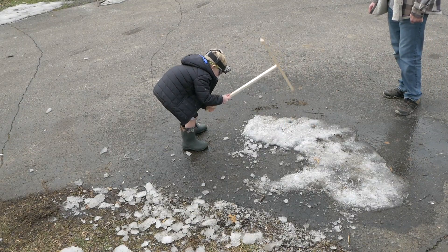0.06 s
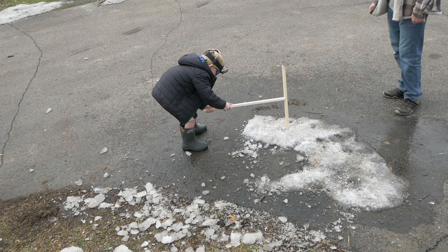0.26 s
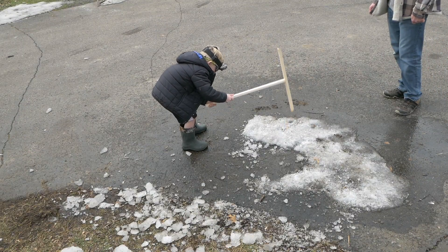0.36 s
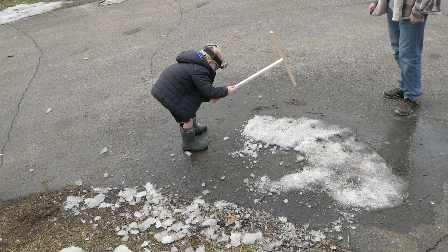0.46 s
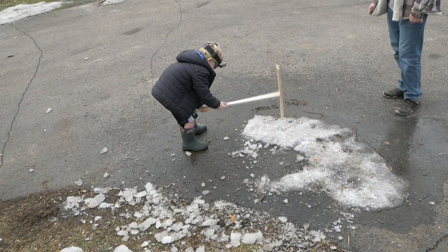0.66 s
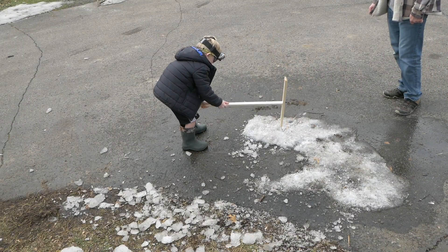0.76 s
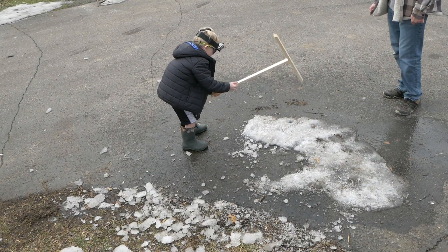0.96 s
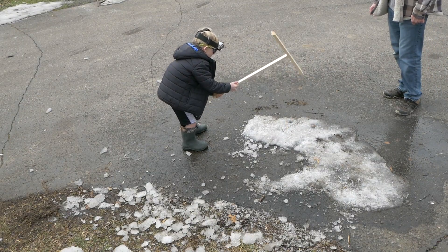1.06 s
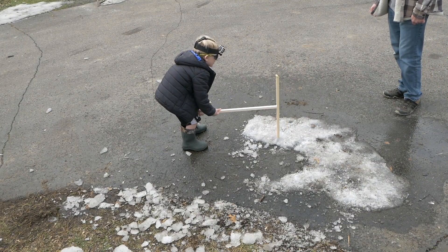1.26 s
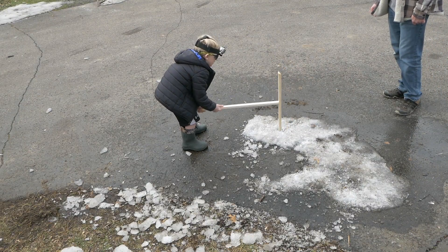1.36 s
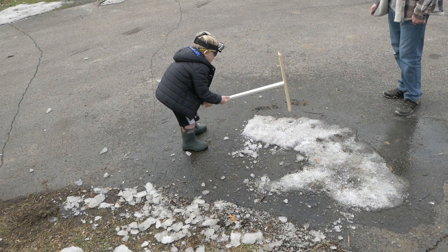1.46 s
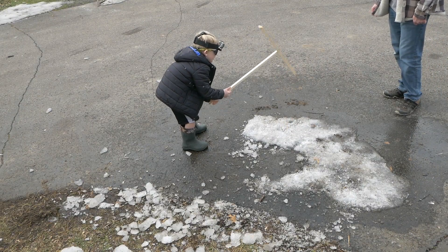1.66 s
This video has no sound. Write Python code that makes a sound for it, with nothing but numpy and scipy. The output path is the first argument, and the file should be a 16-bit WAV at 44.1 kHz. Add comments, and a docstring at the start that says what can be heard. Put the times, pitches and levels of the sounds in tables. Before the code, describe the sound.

A pick strikes ice on pavement at about 0.2, 0.7 and 1.3 seconds, a few metres away. Each blow is a sharp crack with a short thud and a brief ring from the pick. Ice crumbs patter down after each one, and faint ticks and scuffs fall in between. A soft, short echo trails the strikes, over a quiet, low outdoor rumble throughout.

```python
"""A pick on ice

A pick with a wooden handle strikes ice on wet pavement three times, a few metres away.
Each blow cracks the ice, thuds into the ground and rings the pick; loose chips tick afterwards.
The surroundings send back a late wash of sound and one faint echo over a quiet outdoor hush."""
import sys
import numpy as np
from scipy import signal
from scipy.fft import rfft, irfft
from scipy.io import wavfile
from scipy.ndimage import uniform_filter1d

SR = 44100
rng = np.random.default_rng(int(sys.argv[2]) if len(sys.argv) > 2 else 0)


def dump(signal):
    """Clip the signal to [-1, 1] and save it as 16-bit WAV at the path in sys.argv[1]."""
    limited = np.clip(np.atleast_2d(signal).T, -1, 1)
    pcm = np.round(limited * 32767).astype(np.int16)
    wavfile.write(sys.argv[1], SR, pcm)


N = 74970
T = np.arange(N) / SR

# The blows: t/s, crack level/dB, crack decay/s, thud level/dB, thud f/Hz,
# crumble level/dB, crumble decay/s, second bite delay/s, bite level/dB
STRIKES = [(0.217, -8, 0.0026, -25, 214, -12, 0.0024, 0.0037, -19.5),
           (0.745, -11.5, 0.0015, -14.5, 386, -26.5, 0.0049, 0.0042, -22),
           (1.3008, -12, 0.0026, -17.5, 302, -19, 0.0047, .0162, -24.5)]
def pick_blows(crack_hold_s=0.00084, bite_decay_s=0.0046):
    """The ice cracks and crumbles, the ground thuds, the pick rings and its tip bites once more."""
    out = np.zeros(N)
    for blow, row in enumerate(STRIKES):
        start, crack_db, crack_s, thud_db, thud_hz, crumble_db, crumble_s, bite_delay, bite_db = row
        crack = breaking_ice(blow, np.exp(-np.maximum(T - crack_hold_s, 0) / crack_s))
        crumble = breaking_ice(blow, np.exp(-T / crumble_s))
        add(out, start, gain(crack_db) * crack + gain(crumble_db) * crumble)
        add(out, start, gain(thud_db) * ground_thud(thud_hz) + pick_ring(blow))
        bite = band(breaking_ice(blow, np.exp(-T / bite_decay_s)), hz=3020, width_hz=14000)
        add(out, start + bite_delay, gain(bite_db) * set_energy(bite))
    return out


# Tone of the breaking ice: f/Hz, relative level/dB in blows 1, 2 and 3
ICE_TONE = [(81, -52, -24, -32), (332, -12, -26.5, -5), (573, -3, 8.5, -2.5), (830, -6.5, -6.5, 1.5),
            (990, -12.5, -16.5, -6.5), (1490, 5.5, 1, 5), (2124, -2.5, 3, -1), (2330, -0.5, -8, -10),
            (2640, 4.5, -6, 2), (3740, -0.5, -3.5, -6.5), (4900, -9, -16.5, -7), (6000, -13, -16.5, -14.5),
            (8250, -13, -10, -12), (10000, -7.5, -20, -16.5), (14700, -21.5, -28, -22)]
def breaking_ice(blow, envelope):
    """Many tiny fractures blur into one burst of noise, with its own tone for each blow."""
    tone = [(hz, levels[blow]) for hz, *levels in ICE_TONE]
    return set_energy(colour(burst(envelope), tone))


# The pick's natural notes: f/Hz, time to fade by 60 dB/s, level/dB in blows 1, 2 and 3
PICK_NOTES = [(641, 0.21, -40, -27.5, -18), (901.5, 0.14, -25, -23, -53), (1214, 0.041, -27, -14, -32),
              (1294, 0.082, -27, -26, -23), (1560, 0.013, -19, -30, -45), (1658.5, 0.11, -14, -14.5, -18.5),
              (2648, 0.072, -43, -19, -21), (2846, 0.014, -5, -1, -27), (3440, 0.046, -40, -49, -26),
              (3790, 0.024, -6.5, -39, -15.5), (5085, 0.029, -18.5, -21, -26),
              (7160, 0.02, -37, -36, -14.5), (10300, 0.019, -29, -36, -16)]
def pick_ring(blow, rise_s=0.0018):
    """The struck pick vibrates at several pitches at once, each dying away at its own rate."""
    out = np.zeros(N)
    for hz, fade_s, *levels in PICK_NOTES:
        note = np.sin(2 * np.pi * hz * T) * fade(T, fade_s)
        out += gain(levels[blow]) * rng.choice([-1, 1]) * note
    return out * (1 - np.exp(-T / rise_s))


def ground_thud(hz, lag_s=0.00078):
    """The ground takes the blow as one swing that dies almost at once."""
    push = signal.unit_impulse(N, int(lag_s * SR))
    return set_energy(band(push, hz, width_hz=1.35 * hz))


# Ice chips and small scuffs, plus a faint echo of each blow about 0.146 s later (rows at 0.363, 0.8905 and
# 1.445 s): t/s, level/dB, centre f/Hz, width/Hz, decay/s
TICKS_AND_ECHOES = [(0.032, -43, 1910, 3880, 0.009), (0.046, -42, 1850, 4630, 0.005),
                    (0.266, -43, 11100, 8000, 0.012), (.298, -32.5, 3170, 2380, 0.026),
                    (.3426, -35, 2880, 2000, 0.0023), (0.363, -34.5, 1390, 1220, 0.0056),
                    (.369, -43.5, 7000, 11200, 0.009), (0.431, -35, 2680, 2550, 0.074),
                    (.609, -44.5, 3450, 2000, 0.0024), (0.6753, -51.5, 4970, 8000, .002),
                    (0.846, -42.5, 2000, 4000, 0.0022), (.868, -36.5, 930, 1390, 0.047),
                    (.8905, -31, 714, 1160, 0.0061), (1.136, -47.5, 11500, 6000, 0.015),
                    (1.2145, -39, 1420, 1330, 0.0026), (1.245, -38.5, 2810, 3980, 0.081),
                    (1.271, -37.5, 2320, 1780, 0.0022), (1.353, -39.5, 10500, 1650, 0.0041),
                    (1.365, -48, 12000, 6000, .003), (1.445, -33, 1330, 400, 0.012)]
def chips_and_echoes():
    """Loose ice and grit tick and scuff, and each blow comes back as a faint echo; each is a short burst of
    noise."""
    out = np.zeros(N)
    for start, db, hz, width_hz, decay_s in TICKS_AND_ECHOES:
        tick = band(burst(np.exp(-T / decay_s)), hz, width_hz)
        add(out, start, gain(db) * set_energy(tick))
    return out


def falling_crumbs(count=160, first_fall_s=0.075, fall_spread_s=0.042, size_spread_db=13.5):
    """Crumbs of ice thrown up by each blow patter back onto the pavement."""
    taps = np.zeros(N)
    for start, *_ in STRIKES:
        landings = start + first_fall_s + fall_spread_s * rng.gamma(2, size=count)
        sizes = gain(size_spread_db * rng.standard_normal(count)) * rng.choice([-1, 1], count)
        taps += np.histogram(landings * SR, N, (0, N), weights=set_energy(sizes))[0]
    return gain(-34.5) * band(taps, hz=3440, width_hz=5400)


# Tone of the sound that bounces back: f/Hz, relative level/dB
BOUNCE_TONE = [(150, 8.5), (500, -6), (1200, 8), (1700, -7.5), (2500, 0), (3700, 4.5), (6000, 0.5),
               (10000, -9), (15000, 3)]
def surroundings(sound, wash_delay_s=0.056, wash_rise_s=0.12, echo_delay_s=0.1455):
    """Sound comes back as weak scatter from nearby ground, a late wash and a far wall's faint echo."""
    late = np.maximum(T - wash_delay_s, 0)
    swell = (1 - np.exp(-late / wash_rise_s)) * fade(late, fade_s=0.41)
    wash = colour(rng.standard_normal(N) * swell, BOUNCE_TONE)
    near = colour(rng.standard_normal(N) * fade(T, fade_s=0.27), BOUNCE_TONE)
    echo = band(burst(np.exp(-T / 0.005)), hz=2360, width_hz=8800)
    bounces = reflection(wash, db=-20) + reflection(near, db=-22.5)
    add(bounces, echo_delay_s, reflection(echo, db=-34.5))
    return signal.fftconvolve(sound, bounces)[:N]


# Tone of the outdoor hush: f/Hz, relative level/dB
HUSH_TONE = [(25, -14.5), (60, -6), (115, -1.5), (180, -4), (300, -13), (500, -12.5), (750, -14.5),
             (1200, -16), (1700, -27), (2700, -27.5), (3600, -23.5), (4600, -33.5), (8000, -36),
             (13000, -37), (16000, -43)]
def outdoor_hush():
    """Steady distant noise, mostly a low rumble."""
    noise = colour(rng.standard_normal(N), HUSH_TONE)
    return gain(-42) * noise / np.std(noise)


def gain(db):
    """Turn decibels into a multiplier."""
    return 10 ** (np.asarray(db) / 20)


def fade(t, fade_s):
    """A curve that falls by 60 dB in fade_s seconds."""
    return np.exp(-np.log(1000) * t / fade_s)


def add(out, start_s, sound):
    """Mix a sound in from start_s on."""
    i = int(start_s * SR)
    out[i:] += sound[:N - i]


def set_energy(x):
    """Scale a burst to the energy of 5 ms at full level."""
    return x / np.sqrt(np.sum(x ** 2) / (0.005 * SR))


def reflection(x, db):
    """Scale a pattern of echoes to a total strength of db."""
    return gain(db) * x / np.linalg.norm(x)


def colour(x, points):
    """Shape the tone along a curve of (f/Hz, level/dB) points."""
    hz, db = np.array(points).T
    size = 2 * N
    freqs = np.maximum(np.arange(N + 1) * SR / size, 1)
    curve = gain(np.interp(np.log(freqs), np.log(hz), db))
    # Fold the filter forward in time, so nothing sounds before its cause.
    cepstrum = irfft(np.log(curve))
    cepstrum[1:N] *= 2
    cepstrum[N + 1:] = 0
    return irfft(rfft(x, size) * np.exp(rfft(cepstrum)))[:N]


def band(x, hz, width_hz):
    """Keep the pitches around hz by filtering twice."""
    b, a = signal.iirpeak(min(hz, SR / 2 - 1000), hz / min(width_hz, SR / 3), fs=SR)
    return signal.lfilter(b, a, signal.lfilter(b, a, x))


def burst(envelope, size=16384):
    """Even noise whose loudness follows the envelope curve."""
    x = rng.standard_normal(size) * envelope[:size]
    for _ in range(2):
        spectrum = rfft(x)
        x = irfft(spectrum / (np.abs(spectrum) + 1e-12))  # make all pitches equally strong
        loudness = np.sqrt(np.abs(uniform_filter1d(x ** 2, size=96)) + 1e-14)
        x = x * envelope[:size] / loudness
    return set_energy(np.pad(x, (0, N - size)))


def scene():
    """Everything is heard from the centre, with only a trace of stereo width."""
    blows = pick_blows()
    centre = blows + chips_and_echoes() + falling_crumbs() + surroundings(blows) + outdoor_hush()
    scatter = reflection(burst(np.exp(-T / 0.00098)), db=-35.5)
    side = signal.fftconvolve(centre, scatter)[:N] + gain(-35.5) * outdoor_hush()
    return centre + side * np.array([[1], [-1]])  # added on the left, subtracted on the right


def record(dry, peak=0.92, top_hz=16200):
    """The loudest peaks are clipped and the highest treble is cut away."""
    treble_cut = signal.ellip(10, 0.2, 90, top_hz, fs=SR, output="sos")
    return signal.sosfilt(treble_cut, np.clip(dry, -peak, peak))


dry = scene()
out = record(dry)
dump(out)
```